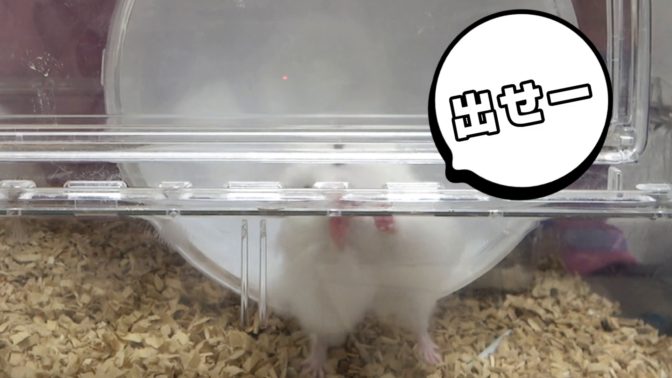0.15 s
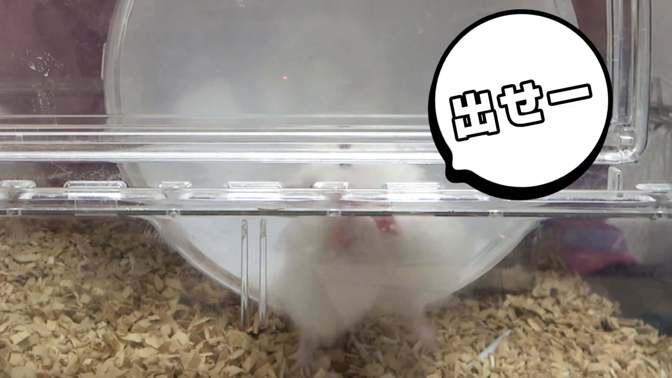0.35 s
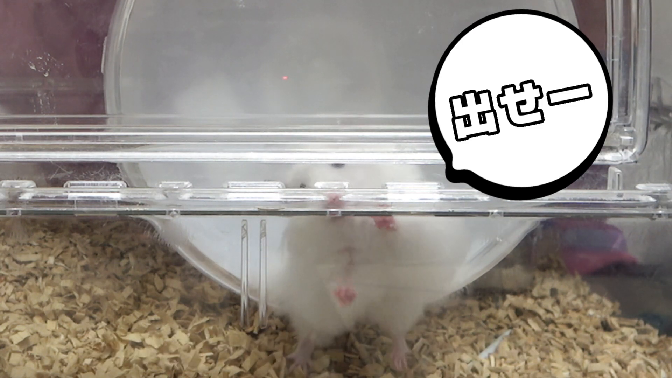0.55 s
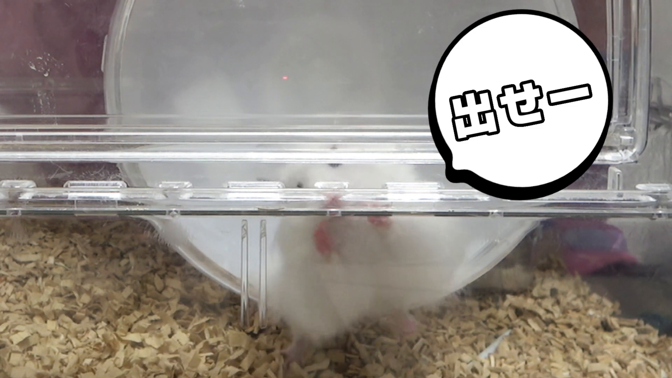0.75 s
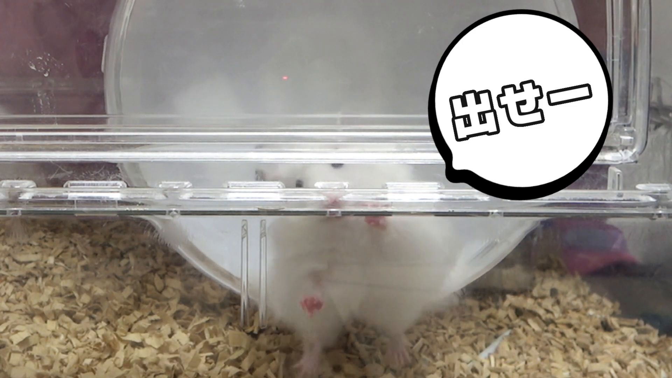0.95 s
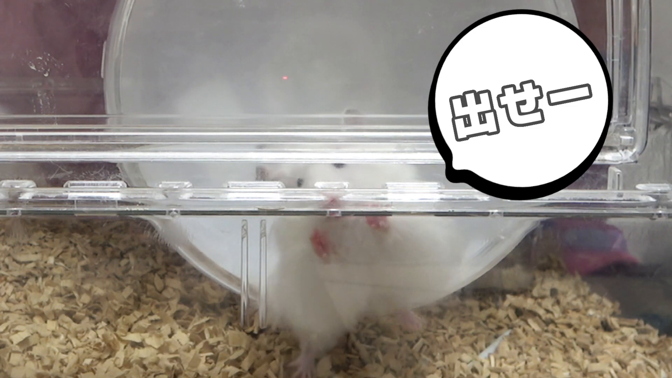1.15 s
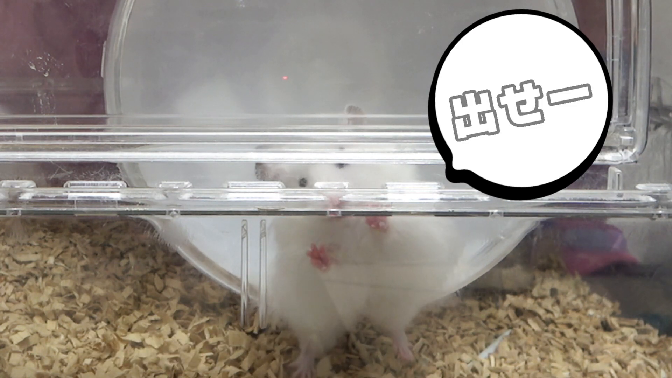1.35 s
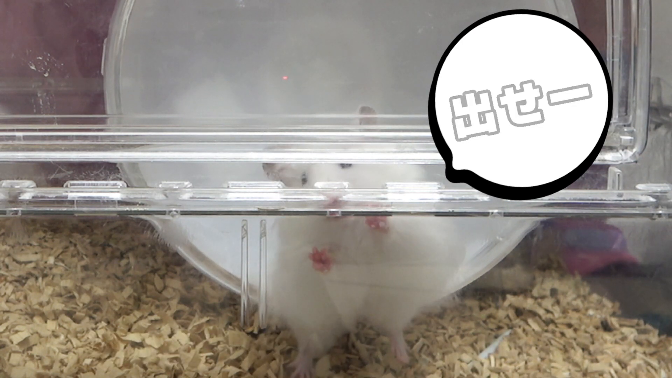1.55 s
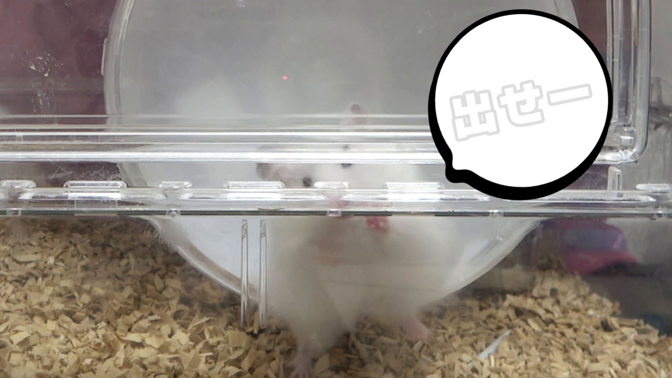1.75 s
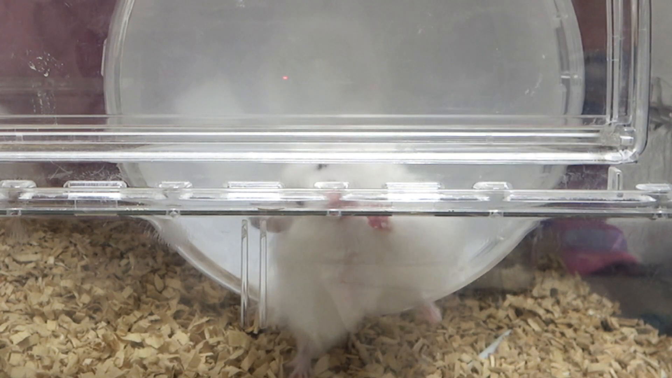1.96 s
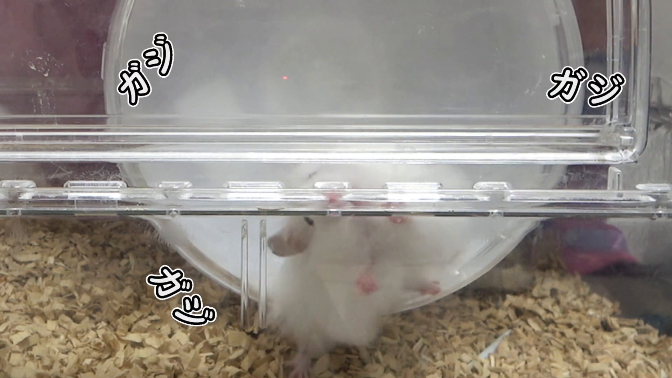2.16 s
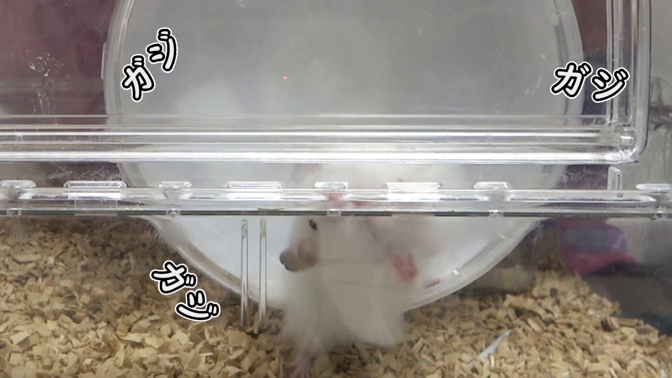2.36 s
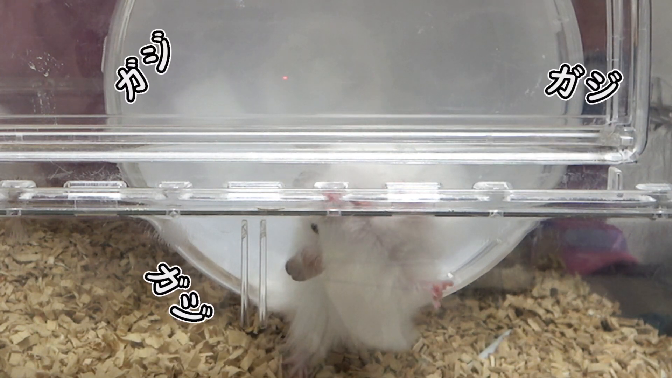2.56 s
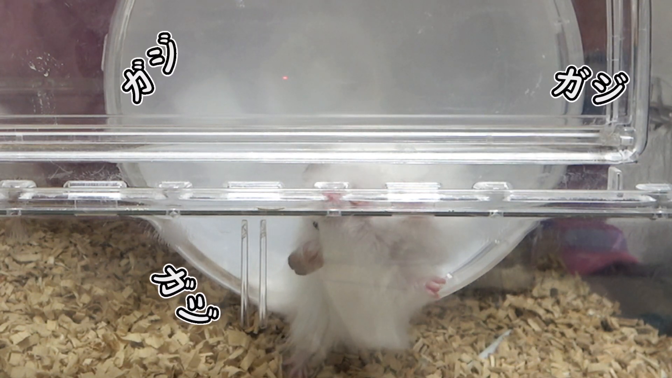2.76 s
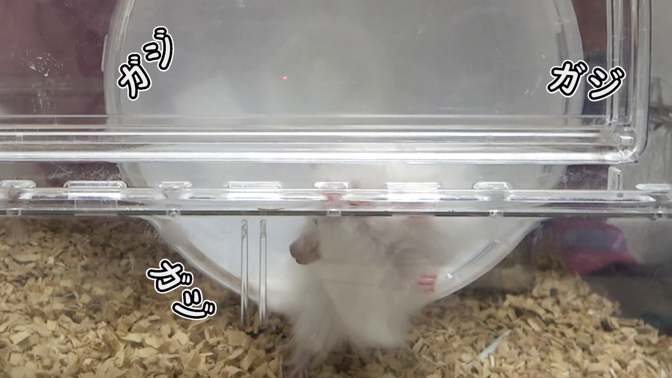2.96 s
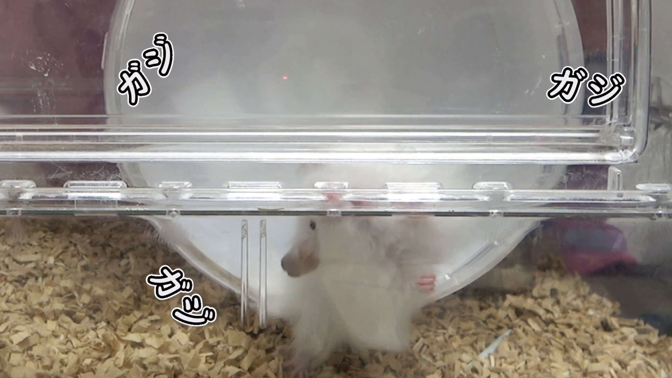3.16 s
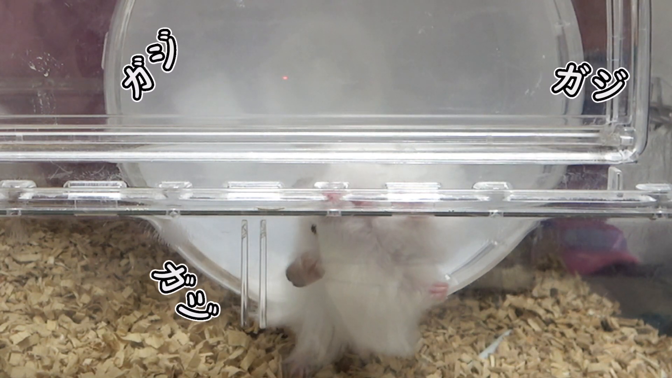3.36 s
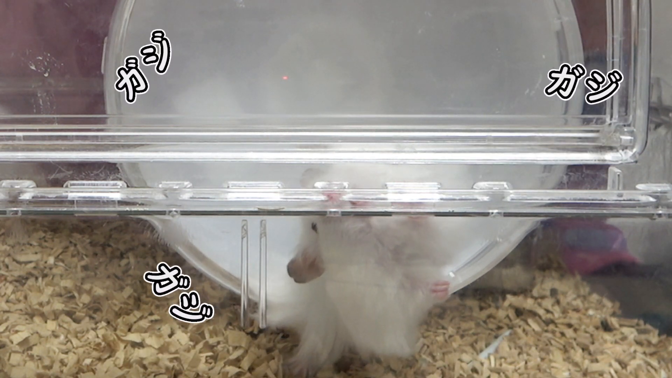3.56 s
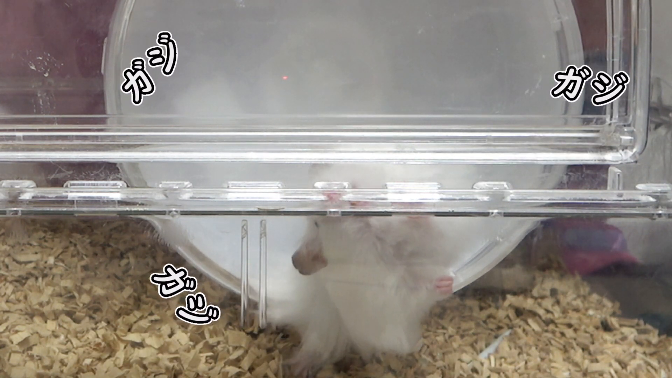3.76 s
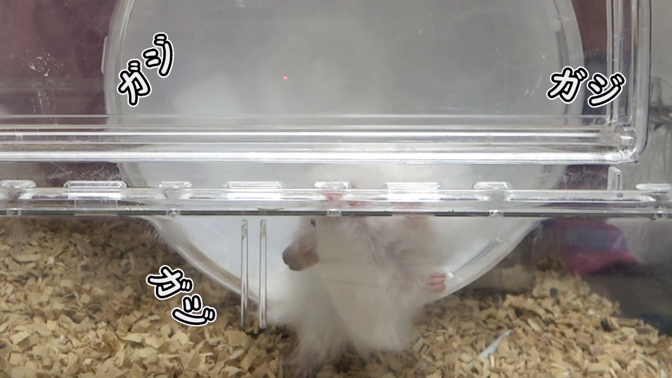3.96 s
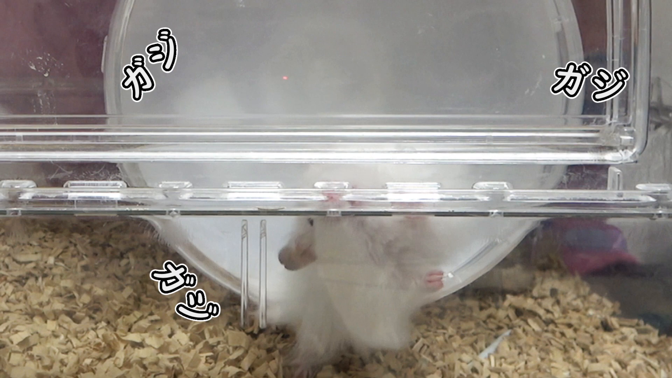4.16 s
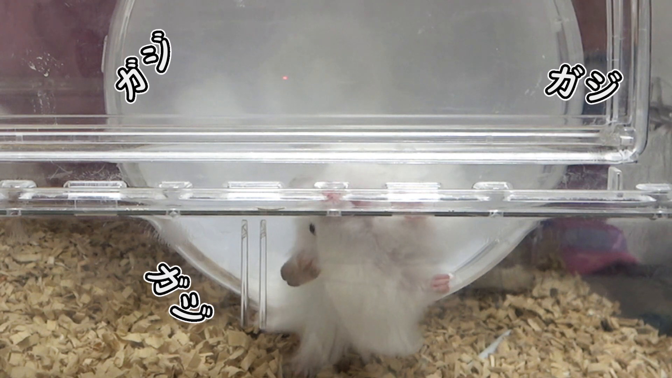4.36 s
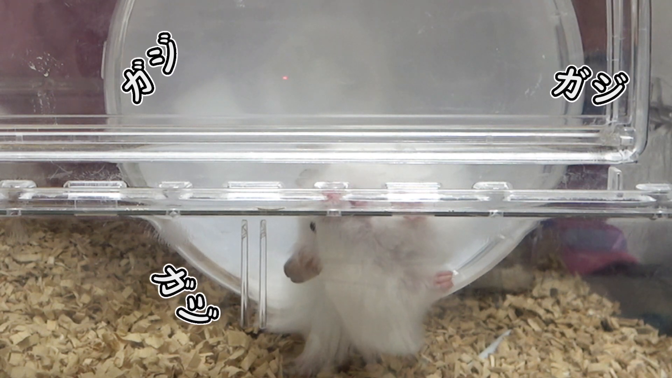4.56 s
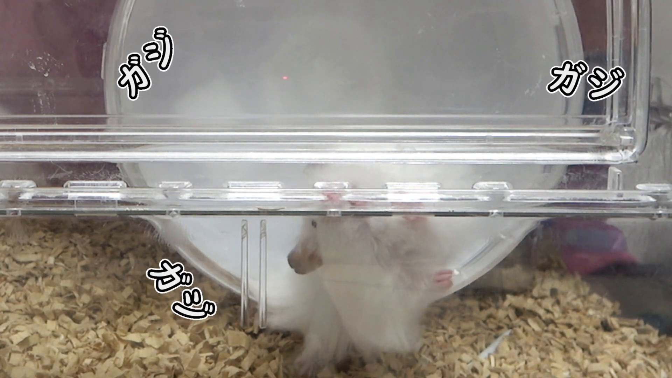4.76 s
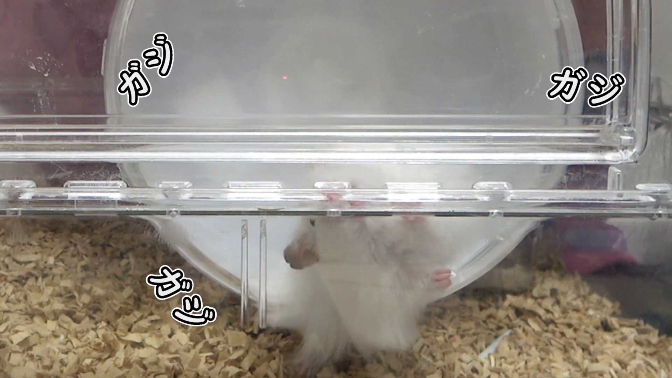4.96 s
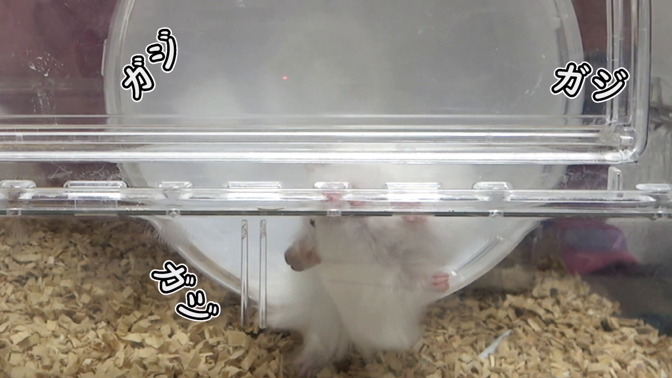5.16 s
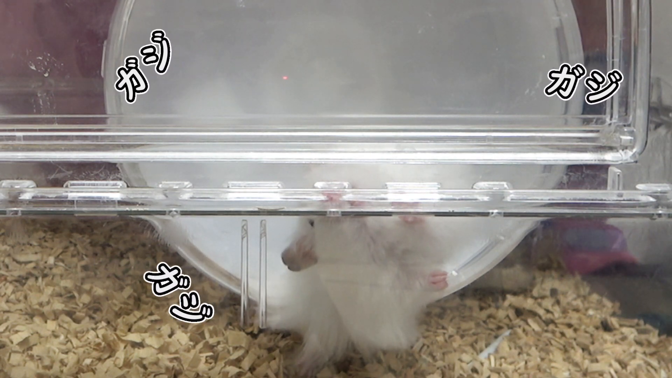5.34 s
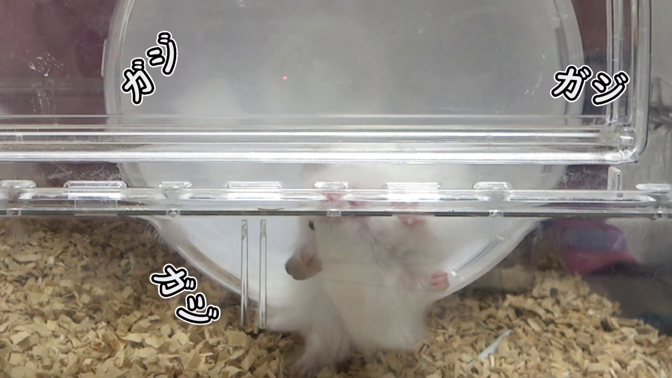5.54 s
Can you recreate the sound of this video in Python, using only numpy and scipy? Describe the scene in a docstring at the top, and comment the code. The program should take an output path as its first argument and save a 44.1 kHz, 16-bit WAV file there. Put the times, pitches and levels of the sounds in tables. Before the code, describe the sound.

After two nearly silent seconds of faint rustling, a small rodent gnaws thin plastic in sharp irregular snaps, scrapes and soft bumps.

```python
"""Gnawing on thin plastic in a quiet room: snaps, juddering pulls and short scrapes, amid soft bumps and rustles.
A hamster stands in its wheel and works its teeth along the cage rim, close to a stereo microphone pair.
Each blow is a force train ringing the same plastic box from one of several spots: modes, noise and room.
A hard tooth-tip contact is bright; a soft one with the body behind it is dull.
Rubbing, wheel rumble, fur, wood shavings and steady hiss are shaped noise or grains."""
import sys
import numpy as np
from scipy import signal
from scipy.fft import rfft, irfft, next_fast_len
from scipy.io import wavfile
from scipy.ndimage import uniform_filter1d

SR = 44100
rng = np.random.default_rng(int(sys.argv[2]) if len(sys.argv) > 2 else 0)


def store_wav(level_fs):
    """Save 16-bit WAV to argv[1]."""
    pcm = np.round(np.clip(np.atleast_2d(level_fs), -1, 1) * 32767)
    wavfile.write(sys.argv[1], SR, pcm.T.astype(np.int16))


N = 246959
RING_SIZE = 12288  # samples in each cage answer

# long pulls, catches evenly paced: (first catch t/s, last catch t/s, catches, strength/dB, hardness/dB)
JUDDERS = [(2.5, 2.644, 5, -38.5, 9), (3.243, 3.294, 3, -40, 1.5), (3.363, 3.424, 4, -43, -8.5),
           (4.313, 4.362, 5, -42, 4.5)]
# stereo width: (f/Hz, side minus mid/dB)
WIDTH = [(120, -12.5), (220, -16.5), (330, 0), (480, -2.5), (1000, 2.5), (4000, 2), (12000, 1)]


def snaps(tone_db=(-2.0, 2.17, 0.0, -1.0), chatter_db=-10, chatter_s=0.0037, usual_db=-42, doubling_db=13):
    """A tooth slips off the rim: one sharp blow, then dying chatter that lasts longer after a stronger bite."""
    # teeth snapping off the rim: (t/s, strength/dB, hardness/dB)
    snap_table = [(2.7324, -44, 15), (2.7964, -54, -15.5), (2.8783, -46.5, 10), (2.9069, -43.5, 20),
                  (3.021, -37.5, 8), (3.0924, -31, 4), (3.4642, -34.5, 10.5), (3.6253, -45.5, 7.5),
                  (3.6616, -53, 3), (3.7894, -42.5, 26), (3.8426, -50.5, -11.5), (4.131, -29, -7.5),
                  (4.4477, -44, 18), (4.5205, -42, 19.5), (4.5541, -45.5, 10), (4.7904, -41.5, 6.5),
                  (4.8639, -42.5, 26.5), (4.9755, -34.5, 2.5), (5.1516, -41, -9), (5.179, -43.5, 0),
                  (5.1923, -43, 28.5), (5.2802, -39.5, 15.5), (5.32, -29, 3)]
    blows = []
    for s, strength_db, hardness_db in snap_table:
        settle_s = chatter_s * 2 ** ((strength_db - usual_db) / doubling_db)
        force = amp(chatter_db) * slips(3 * settle_s)
        force *= np.exp(-np.arange(len(force)) / SR / settle_s)
        force[0] = 1
        blows.append((s, force, touch(strength_db, hardness_db, tone_db)))
    return blows


def judders(grip_share=0.39, break_db=7, graze_db=-14, graze_left=0.12, tone_db=(-2, -5, 1.5, -2)):
    """Short scrapes in a row, each breaking loose with a click: the first grazes, then the tooth digs in."""
    blows = []
    for first_s, last_s, catches, strength_db, hardness_db in JUDDERS:
        times_s, pace_s = np.linspace(first_s, last_s, round(catches), retstep=True)
        for k, s in enumerate(times_s):
            force = slips(grip_share * pace_s)
            force[0] = amp(break_db)
            catch_db = strength_db + graze_db * graze_left ** k
            blows.append((s, force, touch(catch_db, hardness_db, tone_db)))
    return blows


def slides(body, level_db=-7, onset_db=-17, lead=0.7, tone_db=(-9, -7, 0, -6), release_s=0.012):
    """Before a pull takes hold the tooth slides: a dense, fine scrape swells up to the first deep catch."""
    t, hz = np.arange(N) / SR, np.fft.rfftfreq(N, 1 / SR)
    swell = np.zeros(N)
    for first_s, last_s, catches, strength_db, _ in JUDDERS:
        pull_s = last_s - first_s
        since_s = t - first_s - pull_s / (round(catches) - 1)  # from the second catch
        ahead = np.maximum(-since_s, 0) / (lead * pull_s)
        rise = amp(strength_db + level_db + onset_db * ahead ** 2)
        swell += rise * np.exp(-np.maximum(since_s, 0) / release_s)
    colour = amp(tone_db) @ abs(split(hz))
    grit = grains(per_s=3000, spread_db=2.5)
    return swell * shaped(grit, body * colour)


def scrapes(tone_db=(-6.0, -5.5, 1.5, -2.0)):
    """A tooth or claw drags over the plastic, and the rings of its slips pile up."""
    # single strokes: (t/s, length/s, strength/dB, hardness/dB)
    stroke_table = [(0.65, 0.017, -68, -33), (2.285, 0.017, -60.5, -25), (2.431, 0.013, -54.5, -2),
                    (3.703, .008, -37.5, 1), (3.919, 0.01, -38, -1), (4.045, 0.014, -39, -7.5),
                    (4.134, 0.023, -35.5, -14.5), (4.424, 0.0092, -44.5, -8), (4.468, 0.0067, -40.5, -2),
                    (4.623, 0.019, -55, -19.5), (5.108, .006, -47, -16), (5.432, 0.012, -41.5, -14.5),
                    (5.465, .016, -34, -13), (5.508, 0.0046, -51, 1)]
    return [(s, slips(length_s), touch(strength_db, hardness_db, tone_db))
            for s, length_s, strength_db, hardness_db in stroke_table]


def bumps(contact_s=0.013, tone_db=(-39, -33, -17, -2.0)):
    """Soft paws push the wheel against the wall: pressure swells and fades, with hardly any treble."""
    # bumps of paws and body: (t/s, strength/dB)
    bump_table = [(0.21, -62.5), (0.424, -59), (0.627, -55), (0.69, -53), (2.075, -57.5), (2.14, -58.5),
                  (2.225, -76), (2.349, -55), (2.403, -42.5), (2.69, -45), (2.77, -44), (3.519, -47.5),
                  (3.653, -34.5), (3.889, -39.5), (4.573, -41.5), (4.746, -38), (4.83, -31.5), (4.92, -32),
                  (5.24, -49)]
    blows = []
    for s, strength_db in bump_table:
        force = slips(contact_s)
        force *= np.sin(np.pi * np.arange(len(force)) / SR / contact_s)
        blows.append((s - contact_s / 4, force, np.add(strength_db, tone_db)))
    return blows


def rubbing(body, level_db=-14, tick_db=-16, clack_db=-6):
    """Countless touches all over the wall excite the cage's average answer, following the effort."""
    tick, clack, knock, _ = abs(split(np.fft.rfftfreq(N, 1 / SR)))
    colour = knock + amp(clack_db) * clack + amp(tick_db) * tick
    return amp(level_db) * effort() * shaped(grains(per_s=2500, spread_db=2.0), body * colour)


def rumble(level_db=-1):
    """The wheel rumbles under the feet: low-pitched grains of shifting colour, following the effort."""
    # wheel shifting on its axle: (f/Hz, relative level/dB)
    rumble_colour = [(25, -28), (45, -18), (60, -2), (85, -6.5), (120, -5.5), (170, 1.5), (260, -6),
                     (330, -21), (450, -8.5), (900, -50)]
    gain = amp(read(rumble_colour, np.fft.rfftfreq(N, 1 / SR)))
    return amp(level_db) * effort() * shaped(wandering(grains(per_s=1000, spread_db=2)), gain)


def rustles(body, level_db=-3, stir_db=-14, stir_full_db=-67):
    """Fur and shavings brush the wall in swells of fine grains; faint stirring follows effort up to a limit."""
    # soft brushes: (peak t/s, relative level/dB, half length/s)
    brush_table = [(0.0044, -60, 0.048), (0.129, -66.5, 0.013), (0.267, -59.5, 0.027),
                   (0.472, -65.5, 0.057), (0.563, -69, 0.013), (0.66, -70, 0.069), (0.8374, -56, .026),
                   (0.932, -68, 0.056), (1.032, -69, .024), (1.257, -75.5, 0.13), (1.762, -74, 0.018),
                   (1.919, -54.5, .019), (1.977, -68, 0.023), (2.108, -55, 0.016)]
    # brightness of their drive on the cage: (f/Hz, relative level/dB)
    brush_colour = [(300, -55), (900, -15), (1400, 2.5), (1900, 7), (2600, -4), (3600, 9), (4800, 6.5),
                    (6500, 7), (9500, 8), (13000, 12.5), (16000, 14)]
    t, hz = np.arange(N) / SR, np.fft.rfftfreq(N, 1 / SR)
    power = np.zeros(N)
    for s, db, half_s in brush_table:
        fade = np.exp(-2 * (np.hypot(1, 2 * (t - s) / half_s) - 1))
        power += amp(db + level_db) ** 2 * fade
    stir = amp(stir_db) * np.minimum(effort(), amp(stir_full_db))
    brushing = shaped(grains(per_s=6800, spread_db=0.5), body * amp(read(brush_colour, hz)))
    return np.sqrt(power + stir ** 2) * brushing


def hiss(level_db=-71):
    """Still air and microphone hiss: steady coloured noise."""
    # spectrum: (f/Hz, relative level/dB)
    hiss_colour = [(20, -16), (60, 6), (130, 0.5), (230, -7), (330, -8), (600, -5.5), (900, -10),
                   (1300, -21), (2400, -20.5), (3400, -25), (6000, -28.5), (11000, -33), (16000, -37)]
    gain = amp(read(hiss_colour, np.fft.rfftfreq(N, 1 / SR)))
    return amp(level_db) * shaped(rng.standard_normal((2, N)), gain)


def cage(count=16, modes_db=-27, spot_db=6.0, alike=0.4, room_db=-24, crack_db=-2, crack_s=0.00031,
         build_cycles=0.79, in_step_hz=380):
    """The box's answer (mid and side) to a blow at each of several rim spots: modes, weak modes and room."""
    # strong modes: (f/Hz, relative level/dB, t60/s)
    mode_table = [(62, -14.5, .12), (118, -12.5, .082), (161, -3.5, .11), (195, -9.5, .09),
                  (226, -9.5, .086), (266, -19, .18), (288, -7, .14), (354, -7.5, .11), (440, -15, .18),
                  (493, -8.5, .19), (655, -10, .21), (746, 0, .1), (812, -5, .15), (995, 3.5, .12),
                  (1132, -5.5, .043), (1194, 8, .11), (1280, -1, .16), (1435, 0, .09), (1585, -5, .09),
                  (2015, -4, .11), (2190, -2, .085), (2385, -3, .07), (2452, 8.5, .04), (3116, 2, .055),
                  (3188, 1, .07), (4604, -6, .06), (4935, -8, .05), (6380, 5, .035)]
    # crowd of weaker modes: (f/Hz, relative level/dB)
    crowd_colour = [(30, -36), (60, -21), (130, 0), (250, 5), (330, -7.5), (560, -8.5), (850, -8.5),
                    (1300, -8), (1900, -12), (2700, -10), (3700, -10.5), (6400, -10), (10000, -12.5),
                    (12000, -25), (16000, -33)]
    # ring time of the crowd: (f/Hz, t60/s)
    crowd_ring = [(100, 0.052), (300, .12), (1000, 0.12), (2500, 0.1), (6000, 0.045), (14000, 0.019)]
    # ring time of the room: (f/Hz, t60/s)
    room_ring = [(100, 0.45), (1000, 0.32), (5000, 0.28), (14000, 0.05)]
    t = np.arange(RING_SIZE) / SR
    hz, db, t60_s = np.transpose(mode_table)[:, :, None]
    # slow bending waves need a cycle or so to fill the walls, so the bass comes late
    build = 1 - np.exp(-t * hz / build_cycles)
    modes = amp(modes_db + db - 60 * t / t60_s) * build * np.exp(2j * np.pi * hz * t)
    # each spot drives the modes differently; the lowest start nearly in step
    phase = rng.uniform(-np.pi, np.pi, (count, 2, len(hz))) * np.minimum(hz.T / in_step_hz, 1)
    drive = amp(spot_db * rng.standard_normal((count, 1, len(hz)))) * np.exp(1j * phase)
    common = dying_noise(crowd_ring)
    own = np.array([dying_noise(crowd_ring) for _ in drive])
    crowd = np.sqrt(alike) * common + np.sqrt(1 - alike) * own
    crowd = crowd * (1 + amp(crack_db) * np.exp(-t / crack_s))  # louder at the onset
    room = amp(room_db) * np.array([dying_noise(room_ring) for _ in drive])
    both = (drive @ modes).imag + coloured(crowd + room, crowd_colour)
    return np.stack([both[:, 0], coloured(both[:, 1], WIDTH)], axis=1)


def average_answer(answers):
    """Gain per frequency of the cage when it is touched all over."""
    gain = np.sqrt(np.mean(abs(rfft(answers[:, 0])) ** 2, axis=0))
    return np.interp(np.fft.rfftfreq(N, 1 / SR), np.fft.rfftfreq(RING_SIZE, 1 / SR), gain)


def strike(answers, blows, size=16384, top_hz=11500, top_db=1.5, top_follow=0.12):
    """Plays blows (t/s, force, range peaks/dB), each at the next spot; hard ones have more top treble."""
    # seconds over which tick, clack, knock and thud are felt: (span/s)
    felt_s = (.005, .005, .008, .012)
    hz = np.fft.rfftfreq(size, 1 / SR)
    out, ranges = np.zeros((2, N)), split(hz)
    top = (1 + np.tanh(10 * (hz / top_hz - 1))) / 2
    spots = rfft(rng.permutation(answers), size)
    for k, (s, force, levels_db) in enumerate(blows):
        treble_db = top_db + top_follow * (levels_db[0] - levels_db[2])
        ring = spots[k % len(spots)] * evened(force, size) * amp(top * treble_db)
        parts = irfft(ring[0] * ranges, size)
        peaks = np.sqrt([uniform_filter1d(part ** 2, round(span_s * SR)).max()
                         for part, span_s in zip(parts, felt_s)])
        balance = (amp(levels_db) / peaks) @ ranges
        for track, sound in zip(out, irfft(ring * balance, size)):
            add(track, s, sound)
    return out


def touch(strength_db, hardness_db, tone_db):
    """Levels/dB of tick, clack, knock and thud: a harder contact trades bass for treble."""
    # how tick, clack, knock and thud follow hardness: (slope/dB per dB)
    hardness_gain = (0.3, 0.17, -0.073, -0.6)
    return strength_db + hardness_db * np.array(hardness_gain) + tone_db


def slips(length_s, slips_per_s=1700, uneven_db=3, count=128):
    """Stick and slip: a short run of uneven little pushes and releases."""
    wait, size, push = rng.random(count), rng.standard_normal(count), rng.choice([-1, 1], count)
    at_s = np.cumsum(np.r_[0, 0.3 + 1.4 * wait[1:]]) / slips_per_s
    return np.bincount((at_s * SR).astype(int), push * amp(uneven_db * size) * (at_s <= length_s))


def effort():
    """How hard the body works against the wheel, as a gain at every sample."""
    # (t/s, effort/dB)
    effort_curve = [(0, -69.5), (.7, -66), (1.55, -77), (2.0, -66), (2.12, -67.5), (2.42, -48), (2.6, -82),
                    (2.8, -54), (2.86, -62.5), (2.97, -48), (3.15, -52), (3.58, -55.5), (4.2, -50),
                    (4.65, -51.5), (4.72, -59), (5.0, -53), (5.6, -48)]
    return amp(np.interp(np.arange(N) / SR, *np.transpose(effort_curve)))


def grains(per_s, spread_db):
    """Mid and side trains of tiny touches, a few of them larger."""
    size = amp(spread_db * np.minimum(rng.exponential(1, N), 4)) * (rng.random(N) < per_s / SR)
    return size * rng.standard_normal((2, N))


def wandering(x, patchy_db=3, patch_s=0.07, patch_hz=70):
    """The weight keeps shifting, so different pitches come forward from moment to moment."""
    hz, t, z = signal.stft(x, SR, nperseg=2048, noverlap=1536)
    field = uniform_filter1d(rng.standard_normal(z.shape[1:]), max(round(patch_hz / hz[1]), 1), axis=0)
    field = uniform_filter1d(field, max(round(patch_s / t[1]), 1), axis=1)
    patches = amp(patchy_db * field / field.std())
    return signal.istft(z * patches, SR, nperseg=2048, noverlap=1536)[1][:, :N]


def dying_noise(ring):
    """Mid and side noise in which each frequency dies at its own speed."""
    hz, t, z = signal.stft(rng.standard_normal((2, RING_SIZE)), SR, nperseg=128)
    decay = amp(-60 * t / read(ring, hz)[:, None])
    return signal.istft(z * decay, SR, nperseg=128)[1][:, :RING_SIZE]


def split(hz):
    """Causal crossovers: one response each for tick, clack, knock and thud."""
    # borders between the four ranges: (f/Hz)
    edges_hz = (4500, 1700, 350)
    rest, ranges = np.ones(len(hz)), []
    for edge_hz in edges_hz:
        s = 1j * hz / edge_hz
        low = 1 / (1 + np.sqrt(2) * s + s * s) ** 2
        ranges.append(rest * low * (s * s) ** 2)
        rest = rest * low
    return np.array(ranges + [rest])


def evened(force, size, smooth_hz=90):
    """Spectrum of a force, broad humps smoothed away: the pitch of a bite comes from the cage alone."""
    spectrum = rfft(force, size)
    power = uniform_filter1d(abs(spectrum) ** 2, max(round(smooth_hz * size / SR), 1))
    return spectrum * causal((power + 0.013 * power.mean()) ** -0.5)


def shaped(x, gain):
    """Gives mid and side a spectrum and the stereo width, with the mid at unit level."""
    width = amp(read(WIDTH, np.fft.rfftfreq(N, 1 / SR)))
    out = irfft(rfft(x) * gain * np.array([np.ones(len(width)), width]), N)
    return out / out[0].std()


def coloured(x, points):
    """Filters causally with the given dB curve."""
    size = 2 * x.shape[-1]
    response = causal(amp(read(points, np.fft.rfftfreq(size, 1 / SR))))
    return irfft(rfft(x, size) * response, size)[..., :size // 2]


def causal(gain):
    """Minimum-phase response with these gains: it rings only after the blow, never before it."""
    log_gain = np.log(np.r_[gain, gain[-2:0:-1]])
    return np.exp(np.conj(signal.hilbert(log_gain)))[:len(gain)]


def amp(db):
    """Decibels to gain."""
    return 10 ** (np.asarray(db) / 20)


def read(points, hz):
    """A table of (f/Hz, value) joined on a log-frequency axis."""
    f, value = np.transpose(points)
    return np.interp(np.log(hz + 1), np.log(f + 1), value)


def add(mix, s, sound):
    """Adds a sound into a track at time s."""
    part = mix[max(round(s * SR), 0):][:len(sound)]
    part += sound[:len(part)]


def microphones(mid, side, lead_s=0.000434, direct=0.56, scattered=0.67):
    """Two close ports: the cage is a little to the left, so above the bass that side leads and is mostly louder."""
    # place of the cage: (f/Hz, left minus right/dB)
    lean_curve = [(60, 0.5), (250, 0), (600, 4.5), (1200, 2), (2200, -1), (5000, 1.5), (14000, 0)]
    size = next_fast_len(N + 64)
    hz = np.fft.rfftfreq(size, 1 / SR)
    mid, side = rfft([mid, side], size)
    lead = 1j * direct * np.sin(2 * np.pi * hz * lead_s) * amp(read(WIDTH, hz))
    side = scattered * side + lead * mid
    lean_db = read(lean_curve, hz)
    return irfft(np.array([mid + side, mid - side]) * amp([lean_db / 2, -lean_db / 2]), size)[:, :N]


def scene():
    """All blows and touches ring the one cage, over rumble and hiss."""
    answers = cage()
    body = average_answer(answers)
    blows = sum(strike(answers, kind) for kind in (snaps(), judders(), scrapes(), bumps()))
    touches = slides(body) + rubbing(body) + rustles(body)
    return microphones(*(blows + touches + rumble() + hiss()))


def record(dry, low_cut_hz=48, edge_hz=16300):
    """Bass cut and upper band limit of the microphone chain."""
    thinned = signal.sosfilt(signal.butter(2, low_cut_hz, "high", fs=SR, output="sos"), dry)
    taps = signal.firwin(511, edge_hz, window=("kaiser", 9), fs=SR)
    return signal.oaconvolve(thinned, taps[None], "same")


dry = scene()
out = record(dry)
store_wav(out)
```